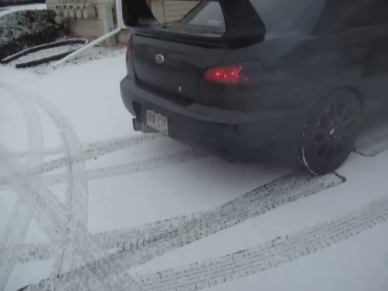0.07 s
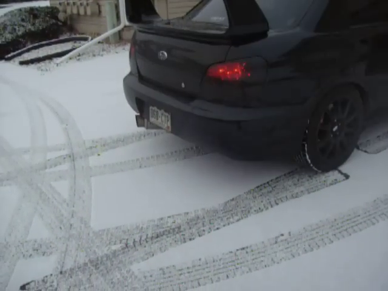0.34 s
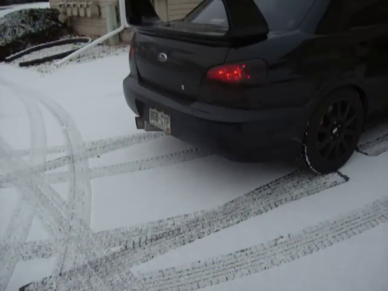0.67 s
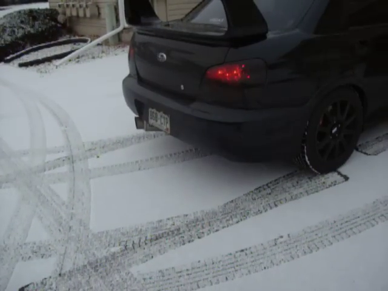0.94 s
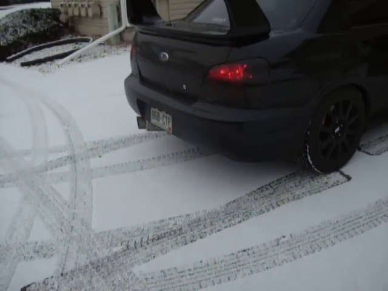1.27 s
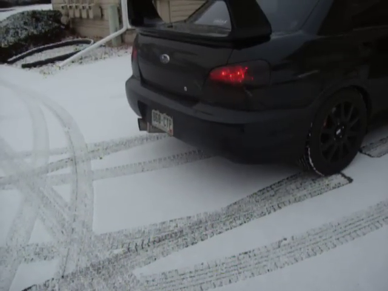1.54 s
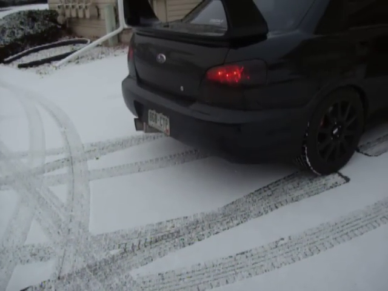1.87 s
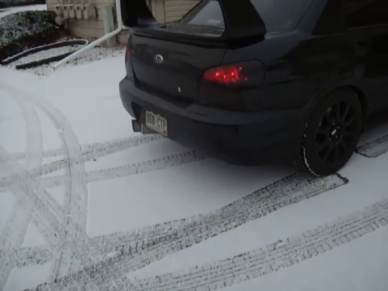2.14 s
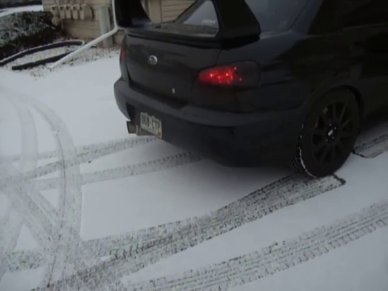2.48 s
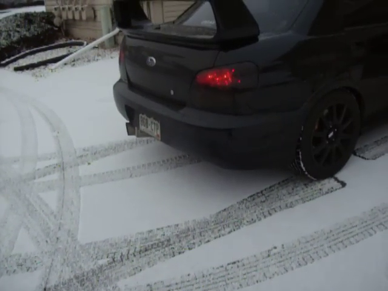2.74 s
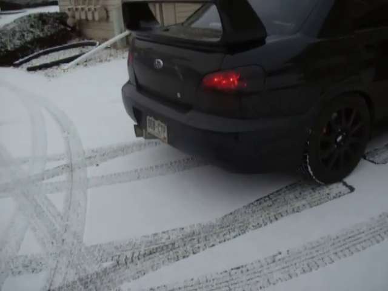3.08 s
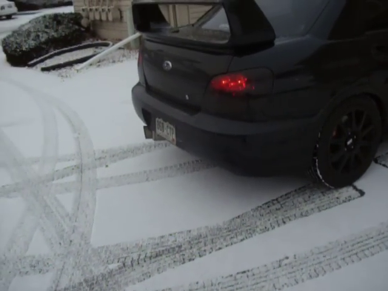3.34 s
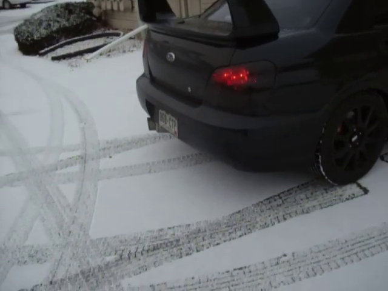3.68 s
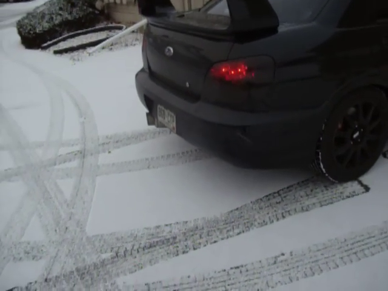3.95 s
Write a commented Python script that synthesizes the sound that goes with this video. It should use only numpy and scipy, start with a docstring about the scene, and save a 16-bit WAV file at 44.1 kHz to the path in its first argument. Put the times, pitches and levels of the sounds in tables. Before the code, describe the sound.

A car engine revs high outdoors, a few metres away. Four short, loud bursts of exhaust bangs hit at about 0.2, 0.6, 0.9 and 1.3 seconds, slightly distorted, with a booming drone between them. From 1.4 seconds the revs fall steadily, throbbing and raspy, with a faint hiss and soft fluttering puffs of air. At about 3.6 seconds the engine catches into a low, lumpy idle.

```python
"""On a snowy driveway, a parked turbocharged flat-four engine hits its rev limiter four times: short
volleys of bangs take turns with fuel cuts, in which it only pumps air. The throttle shuts, the revs
fall with a fluttering hiss, and the engine catches into a lumpy idle. Exhaust pipes of unequal length
(the headers) make it throb. A small recorder turns itself down on loud bangs and overloads."""
import sys
import numpy as np
from scipy import signal
from scipy.fft import rfft, irfft, next_fast_len
from scipy.io import wavfile

SR = 44100
rng = np.random.default_rng(int(sys.argv[2]) if len(sys.argv) > 2 else 0)


def wav_record(signal):
    """Record a signal, one row per channel, as 16-bit PCM in the file named by sys.argv[1]."""
    frames = np.transpose(np.atleast_2d(signal))
    bounded = np.clip(frames, -1, 1)
    # unit amplitude maps onto the largest positive 16-bit level
    quanta = np.round(bounded * 32767).astype(np.int16)
    wavfile.write(sys.argv[1], SR, quanta)


N = 176400
T = np.arange(N) / SR

# Bursts of firing at the limiter: start t/s, end t/s, level/dB, pulse rate reached f/Hz
VOLLEYS = [(0.184, 0.254, 1, 150.2), (.557, 0.626, 0.5, 150.7), (.927, 0.995, 2.5, 151.6),
           (1.283, 1.333, 1, 145.5)]
# Tone of the bangs: f/Hz, relative level/dB
BANG_TONE = [(50, -29.5), (110, -5.5), (175, 15.5), (235, 0.5), (295, 13), (390, -13.5), (484, 10),
             (640, -14.5), (800, 1), (937, 4), (1030, -3.5), (1310, 4.5), (1800, -16), (2700, -14.5),
             (5000, -40)]
# Echoes from the house: delay t/s, level/dB
ECHOES = [(.021, -23.5), (0.048, -25.5)]
# Falling revs with the throttle shut: t/s, pulse rate f/Hz
RUN_DOWN = [(1.5, 138), (1.75, 124.5), (2.0, 112), (2.25, 100.3), (2.5, 89), (2.8, 76), (3.0, 65.5),
            (3.25, 55), (3.5, 43), (3.65, 39)]
# Cylinders in firing order: header (0 short, about 1 long), rasp level/dB, crack level/dB
CYLINDERS = [(0, -2.5, 0.5), (0, -2.5, -21.5), (0.999, 2.5, -11), (0.999, 0, -16.5)]
# Strength of the pumped air: t/s, engine note level/dB, rasp level/dB, crack level/dB
PUMPING_LEVELS = [(0, -2, -20, -39.5), (1.28, 2, -18, -34.5), (1.36, 1.5, -14, -40),
                  (1.45, 3, -16.5, -21.5), (1.7, 3, -22, -23.5), (2.05, 1.5, -18, -30),
                  (2.4, 3.5, -21, -27), (2.85, 3, -16.5, -27), (3.15, -2, -18, -44.5),
                  (3.52, -0.5, -15, -43.5), (3.6, -5.5, -19, -60), (4, -7.5, -22.5, -50)]
# Tone of the swirling air at the tailpipe: f/Hz, relative level/dB
RASP_TONE = [(20, -21), (60, -13), (150, 2.5), (280, 7.5), (370, 3), (500, 3.5), (680, -1), (1000, -2.5),
             (1350, -2.5), (1750, -12.5), (2600, -15), (5500, -25.5)]
# Harmonics 1 to 12 of the four-pulse engine cycle, throttle open and shut: relative level/dB
OPEN_HARMONICS = [-30, -31, -20, -9.5, -21, -11.5, -12.5, -20, -11, -20, -23, -19]
SHUT_HARMONICS = [-30, -28.5, -19.5, -9, -14.5, -38, -13, -14, -18.5, -26.5, -15, -20]
# How the exhaust pipe lifts or weakens each pitch: f/Hz, level/dB
PIPE_TONE = [(30, -27.5), (52, -9.5), (63, 0), (77, 1.5), (95, -0.5), (125, 4.5), (148, 1.5), (170, 9.5),
             (198, -1), (240, 0.5), (290, -4.5), (350, -14), (480, -6), (640, -21.5), (1300, -29.5),
             (2500, -54.5)]
# Harmonics booming as they pass a pipe resonance: number, middle t/s, half length t/s, added level/dB
DRONES = [(7, 1.54, 0.2, 4.5), (8, 2.6, .14, 5.5), (4, 2.86, 0.21, 4.5), (11, 3.296, 0.36, 7.5),
          (12, 3.32, 0.17, 7.5)]
# Growl of the higher harmonics: f/Hz, relative level/dB
GROWL_TONE = [(200, -29.5), (400, -26), (530, -25), (620, -37.5), (1150, -33.5), (1800, -45)]
# Tone of the idle thumps: f/Hz, relative level/dB
IDLE_TONE = [(30, -47), (55, -18.5), (75, 7), (100, -4), (145, 14.5), (190, -2.5), (235, 8), (280, 5),
             (340, -20), (480, -17.5), (800, -22.5), (1600, -37.5)]
# Tone of the rushing air: f/Hz, relative level/dB
HISS_TONE = [(500, 3), (1500, 0), (2600, -4), (3300, 1.5), (3800, 4), (4600, 1.5), (5300, -10.5),
             (6000, -32)]
# Strength of the rushing air: t/s, level/dB
HISS_LEVELS = [(0, -29), (.15, -22.5), (1.28, -21.5), (1.42, -18.5), (2.1, -25.5), (2.5, -21.5),
               (3.0, -23.5), (3.5, -25.5), (3.7, -26), (4, -30)]
# Puffs from the air intake as the turbo slows: t/s, level/dB
CHUFFS = [(1.38, -17.5), (1.419, -22.5), (1.491, -20), (1.87, -21), (2.079, -21.5), (2.18, -21),
          (2.39, -28), (2.491, -24.5), (2.58, -19), (2.779, -22), (3.079, -27), (3.159, -30),
          (3.245, -24.5), (3.341, -25), (3.438, -18.5), (3.531, -21), (3.62, -26.5)]
# Pitches at which the intake rings: f/Hz, width f/Hz, relative level/dB
INTAKE_RINGS = [(1378, 21, -5), (1644, 12, -0.5), (1978, 38, -4.5), (3720, 110, -3.5)]
# Strength of the low flutter of air: t/s, level/dB
BUFFET_LEVELS = [(1.3, -46), (1.8, -35.5), (2.8, -34.5), (3.35, -20), (3.6, -32.5), (4, -38)]

IDLE_BEAT_DB = [0.5, -1.5, -1, -8]  # the four firings of an idle cycle: relative level/dB
START_HZ, REFIRE_HZ = 145.5, 139  # pulse rate at first, and when the fuel comes back
LULL_AFTER_S, LULL_S, LULL_DB = 0.026, 0.011, -9.5  # each volley falters after its first cycle
HEADER_LAG_S = 0.00155  # extra travel time through a long header
FIRST_CYLINDER_S, THROTTLE_SHUT_S = 1.588, 1.36  # cylinder one breathes out; the throttle closes
PULSE_SCATTER_DB, WAVER_DB = 2.5, 1.21
BANG_DECAY_S, RASP_DECAY_S, CRACK_LOW_CUT_HZ = 0.0057, 0.0083, 930
STUMBLE_S, IDLE_START_S = 3.568, 3.640  # one lone firing, then the idle holds
IDLE_HZ, IDLE_DB, IDLE_JITTER_S = 38.57, -5, 0.0012
CHUFF_WIDTH_S, INTAKE_DB, BUFFET_HZ = 0.019, -30.5, 54.3
LIMIT_DB, ATTACK_S, RELEASE_DB_PER_S = 1, 0.0015, 50.5
CLIP_LEVEL, BAND_EDGE_HZ, CUTOFF_HZ = 0.67, 5750, 15900


def limiter_bangs():
    """When the fuel comes back, each stroke bangs out of the tailpipe until the limiter cuts it again."""
    pulses, energy = np.zeros(N), 0
    for start, end, db, top_hz in VOLLEYS:
        age = np.arange(0, end - start, 2 / (REFIRE_HZ + top_hz))
        lull = (age > LULL_AFTER_S) & (age < LULL_AFTER_S + LULL_S)
        long_header = np.array(CYLINDERS)[np.arange(len(age)) % len(CYLINDERS), 0]
        jitter, scatter_db = rng.standard_normal((20, 2))[:len(age)].T
        times = start + age + HEADER_LAG_S * long_header + 0.00036 * jitter
        pulses += clicks(times, from_db(db + LULL_DB * lull + scatter_db))
        energy += (end - start) * from_db(db) ** 2
    bangs = np.sqrt(energy * SR / N) * rms_one(shape_tone(blasts(pulses, rough=0.77), BANG_TONE))
    echoes = sum(from_db(db) * np.interp(T - delay, T, bangs, left=0) for delay, db in ECHOES)
    return bangs + echoes


def exhaust_pumping():
    """Even unfired strokes push out air: a booming note, with a rasp and a crack on each stroke."""
    pulse_hz = engine_speed()
    strokes = np.cumsum(pulse_hz) / SR
    strokes -= np.interp(FIRST_CYLINDER_S, T, strokes)
    number = np.arange(np.ceil(strokes[0]), strokes[-1]).astype(int)
    long_header, rasp_db, crack_db = np.array(CYLINDERS)[number % len(CYLINDERS)].T
    times = np.interp(number, strokes, T) + HEADER_LAG_S * long_header
    gains = from_db(PULSE_SCATTER_DB * rng.standard_normal(len(times)))
    puffs = fade(clicks(times, gains * from_db(rasp_db)), RASP_DECAY_S)
    flow = rms_one(puffs) + 1  # puffs on top of a steady stream
    rasp = rms_one(shape_tone(flow * rng.standard_normal(N), RASP_TONE))
    pops = shape_tone(clicks(times, gains * from_db(crack_db)), BANG_TONE)
    crack = rms_one(low_cut(pops, CRACK_LOW_CUT_HZ))
    note_gain, rasp_gain, crack_gain = from_db(in_time(PUMPING_LEVELS))
    return note_gain * engine_note(pulse_hz, strokes) + rasp_gain * rasp + crack_gain * crack


def engine_note(pulse_hz, strokes):
    """Harmonics (multiples of the cycle rate) slide through the pitches at which the pipe rings."""
    cycle_hz, cycles = pulse_hz / len(CYLINDERS), strokes / len(CYLINDERS)
    pipe_hz, pipe_db = np.transpose(PIPE_TONE)
    shut = np.clip((T - THROTTLE_SHUT_S) / 0.02, 0, 1)
    waver_times = np.linspace(0, N / SR, 70)
    waver_db = WAVER_DB * (pulse_hz.max() / pulse_hz)  # a slower engine wavers more
    note = 0
    for k, (open_db, shut_db) in enumerate(zip(OPEN_HARMONICS, SHUT_HARMONICS), 1):
        db = open_db + shut * (shut_db - open_db)
        db += np.interp(np.log(k * cycle_hz), np.log(pipe_hz), pipe_db)
        db += waver_db * np.interp(T, waver_times, rng.standard_normal(len(waver_times)))
        db += sum(lift * np.exp(-((T - t) / half) ** 4) for n, t, half, lift in DRONES if n == k)
        note += from_db(db) * np.sin(2 * np.pi * (k * cycles + rng.random()))
    growl_hz, growl_db = np.transpose(GROWL_TONE)
    for k in range(len(SHUT_HARMONICS) + 1, 44):
        db = np.interp(k * cycle_hz, growl_hz, growl_db)
        note += from_db(db) * np.sin(2 * np.pi * (k * cycles + rng.random()))
    return note


def engine_speed():
    """Exhaust pulses per second: up in each volley, down in each fuel cut, then the long fall."""
    bounces = [point for start, end, _, hz in VOLLEYS for point in ((start, REFIRE_HZ), (end, hz))]
    return in_time([(0.0071, START_HZ)] + bounces + RUN_DOWN)[0]


def idle():
    """The engine fires once, then settles into slow, uneven thumps."""
    times = np.append(np.arange(IDLE_START_S, N / SR, 1 / IDLE_HZ), STUMBLE_S)
    db = np.resize(IDLE_BEAT_DB, len(times)) + rng.normal(0, 1, len(times))
    times += rng.normal(0, IDLE_JITTER_S, len(times))
    thumps = shape_tone(blasts(clicks(times, from_db(db)), rough=0.39), IDLE_TONE)
    idle_share = np.mean(T > STUMBLE_S)
    return from_db(IDLE_DB) * np.sqrt(idle_share) * rms_one(thumps)


def turbo_air():
    """Air rushing through the turbo hisses; with the throttle shut, the intake rings in soft puffs."""
    hiss = from_db(in_time(HISS_LEVELS)[0]) * rms_one(shape_tone(rng.standard_normal(N), HISS_TONE))
    noise = rng.standard_normal(N)
    ringing = sum(from_db(db) * signal.lfilter(*signal.iirpeak(hz, hz / width, SR), noise)
                  for hz, width, db in INTAKE_RINGS)
    chuffs = sum(from_db(db) * np.exp(-0.5 * ((T - t) / CHUFF_WIDTH_S) ** 2) for t, db in CHUFFS)
    steady = from_db(INTAKE_DB) * (T > THROTTLE_SHUT_S)
    return hiss + np.hypot(chuffs, steady) * rms_one(ringing)


def buffeting():
    """A faint, very low flutter of air under the engine note."""
    rumble = signal.sosfilt(signal.butter(2, BUFFET_HZ, fs=SR, output="sos"), rng.standard_normal(N))
    return from_db(in_time(BUFFET_LEVELS)[0]) * rms_one(rumble)


def blasts(pulses, rough):
    """Each pulse is a jump in pressure followed by a short puff of swirling air."""
    return rms_one(pulses) + rough * rms_one(fade(pulses, BANG_DECAY_S) * rng.standard_normal(N))


def shape_tone(x, tone):
    """Filter a sound by a tone table, so that the table's peaks ring after each pulse."""
    size = next_fast_len(N + SR // 2) * 2
    hz, db = np.transpose(tone)
    grid_hz = np.maximum(np.arange(size // 2 + 1) * SR / size, 1)
    gains = from_db(np.interp(np.log(grid_hz), np.log(hz), db))
    # Minimum phase: the ringing comes after a pulse, never before it.
    cepstrum = irfft(np.log(gains))
    cepstrum[1:size // 2] *= 2
    cepstrum[size // 2 + 1:] = 0
    return irfft(rfft(x, size) * np.exp(rfft(cepstrum)))[:N]


def clicks(times, gains):
    """One sharp click at each time."""
    inside = (times >= 0) & (times < (N - 1) / SR)
    return np.bincount((times[inside] * SR).astype(int), gains[inside], N)


def fade(pulses, decay_s):
    """Give each click a tail that dies away."""
    return signal.lfilter([1], [1, -np.exp(-1 / (decay_s * SR))], pulses + 1e-18)


def low_cut(x, hz):
    """Weaken everything below the given pitch."""
    return signal.sosfilt(signal.butter(2, hz, "high", fs=SR, output="sos"), x + 1e-18)


def in_time(rows):
    """Join a table's timed points with straight lines, one curve per column."""
    times, *columns = np.transpose(rows)
    return [np.interp(T, times, column) for column in columns]


def from_db(db):
    """Turn decibels into a gain to multiply by."""
    return 10 ** (np.asarray(db) / 20)


def rms_one(x):
    """Scale a sound so that its average strength (rms) is one."""
    return x / np.sqrt(np.mean(x ** 2) + 1e-20)


def scene():
    """Everything heard from a few metres behind the car, in mono."""
    return (exhaust_pumping() + limiter_bangs() + turbo_air() + idle() + buffeting())[None]


def record(dry):
    """The recorder turns down fast on peaks and recovers slowly; it clips, cuts treble, clips again."""
    excess_db = np.maximum(20 * np.log10(np.abs(dry[0]) + 1e-9) - LIMIT_DB, 0)
    held_db = np.maximum.accumulate(excess_db + RELEASE_DB_PER_S * T) - RELEASE_DB_PER_S * T
    smoothing = np.exp(-1 / (ATTACK_S * SR))
    cut_db = signal.lfilter([1 - smoothing], [1, -smoothing], held_db)
    clipped = np.clip(dry[0] * from_db(-cut_db), -CLIP_LEVEL, CLIP_LEVEL)
    dulled = np.convolve(clipped, signal.firwin(161, BAND_EDGE_HZ, fs=SR), "same")
    clipped_again = np.clip(dulled, -CLIP_LEVEL, CLIP_LEVEL)
    return signal.sosfilt(signal.cheby2(12, 70, CUTOFF_HZ, fs=SR, output="sos"), clipped_again)[None]


dry = scene()
out = record(dry)
wav_record(out)
```